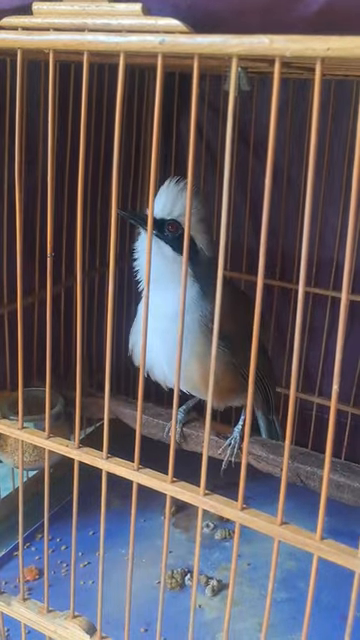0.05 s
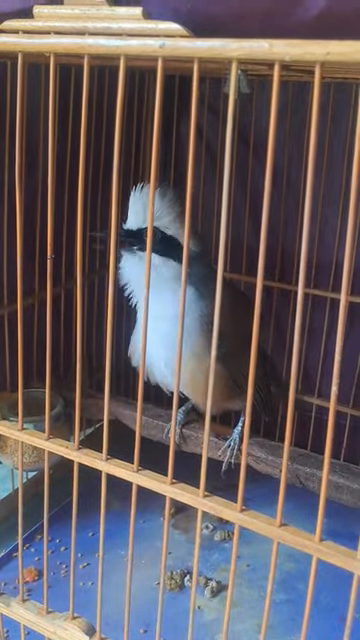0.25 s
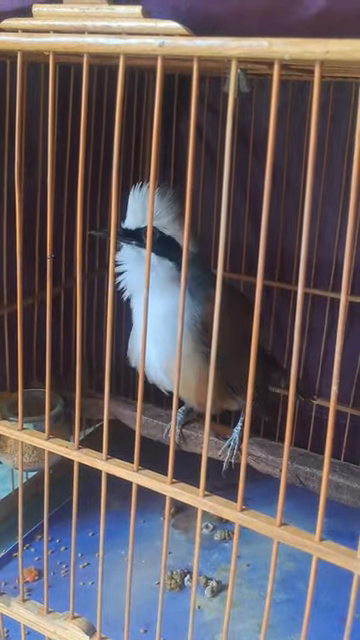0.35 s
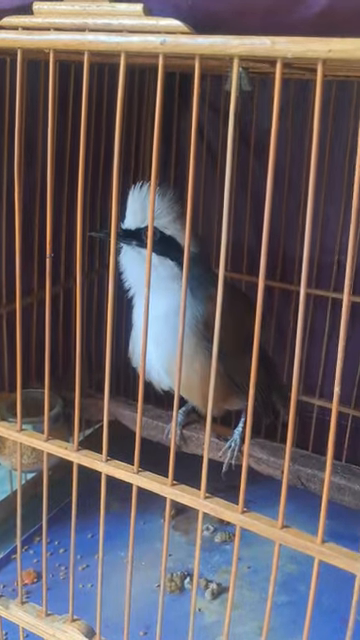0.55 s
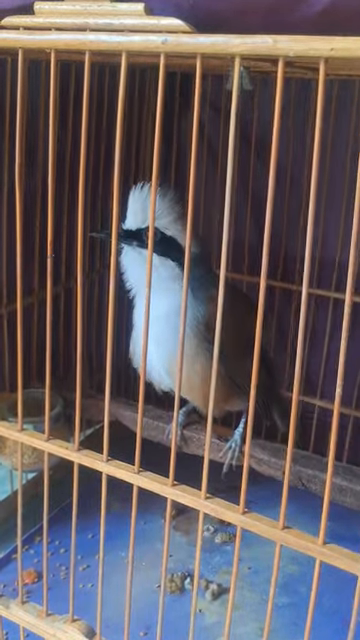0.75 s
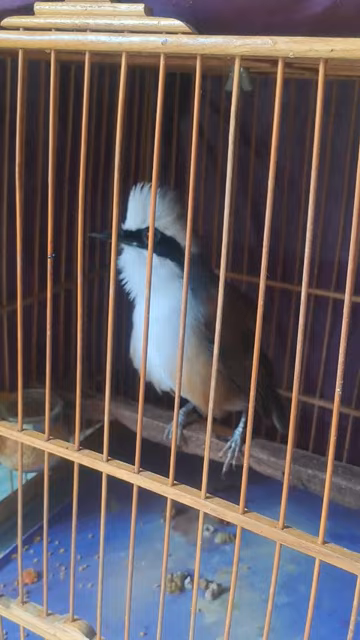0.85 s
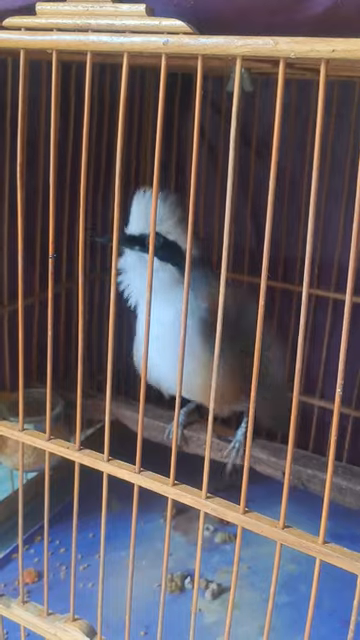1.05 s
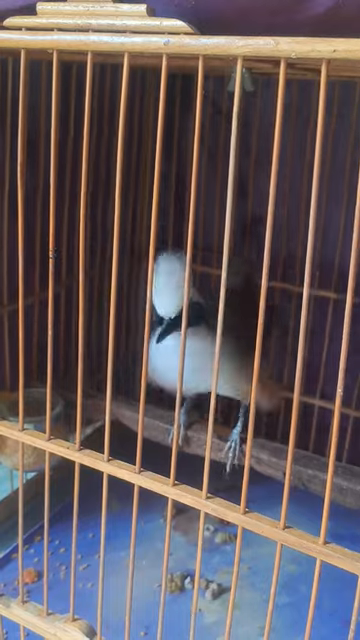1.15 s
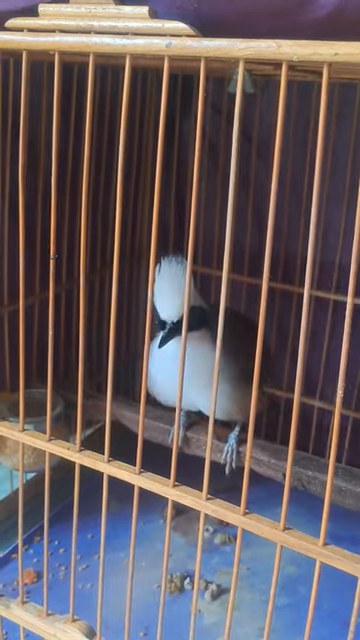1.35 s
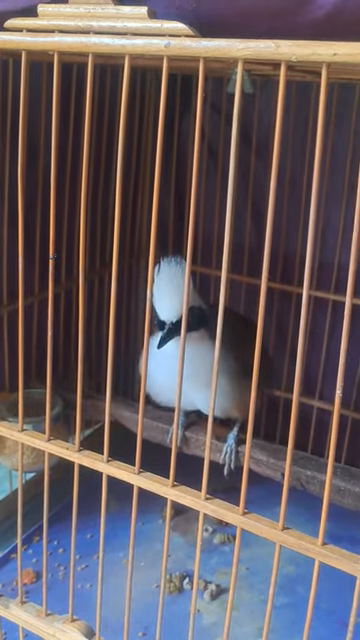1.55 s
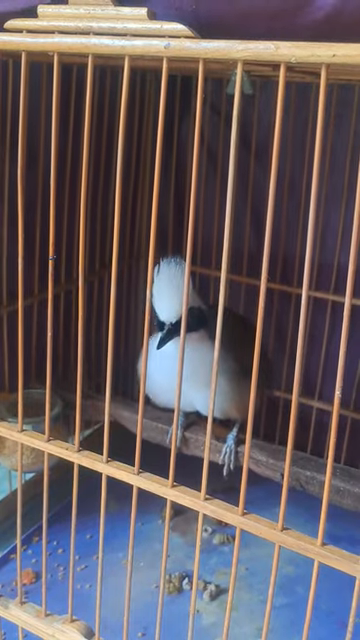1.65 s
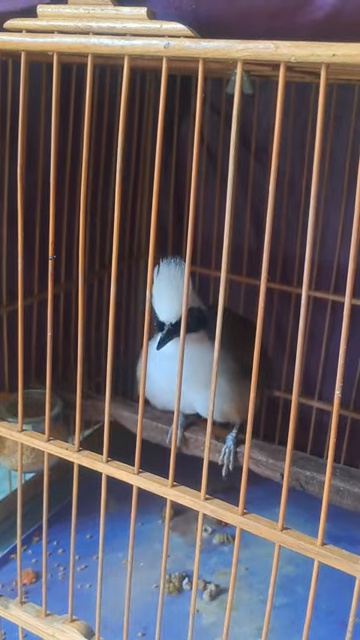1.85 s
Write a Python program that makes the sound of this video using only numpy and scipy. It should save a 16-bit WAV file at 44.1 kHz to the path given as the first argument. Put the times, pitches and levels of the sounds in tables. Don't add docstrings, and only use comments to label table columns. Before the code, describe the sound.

A caged thrush whoops once, loud and close, in a small hard room; scratchy feather and claw rustles follow, then a softer low answering call, bright rising chirps from a small bird, over faint low hum.

```python
import sys
import numpy as np
from scipy import signal
from scipy.fft import rfft, irfft
from scipy.io import wavfile
from scipy.ndimage import uniform_filter1d

SR = 44100
rng = np.random.default_rng(int(sys.argv[2]) if len(sys.argv) > 2 else 0)


def bounce(signal):
    frames = np.transpose(np.atleast_2d(signal))
    limited = np.clip(frames, -1, 1)
    pcm = np.round(limited * 32767).astype(np.int16)
    wavfile.write(sys.argv[1], SR, pcm)


def boost_factor(decibels):
    exponent = np.asarray(decibels, float) / 20
    return 10 ** exponent


N = 83790
TAIL = rng.standard_normal((2, int(.7 * SR)))


def curve(table, x, col=1):
    rows = np.array(table, float)
    return np.interp(x, rows[:, 0], rows[:, col])


def colour(table, hz):
    rows = np.array(table, float)
    return boost_factor(np.interp(np.log(np.maximum(hz, 1)), np.log(rows[:, 0]), rows[:, 1]))


def walk(rate_hz):
    k = max(int(SR / rate_hz), 2)
    steps = np.repeat(rng.standard_normal(N // k + 1), k)
    return 0.63 * uniform_filter1d(uniform_filter1d(steps, k), k)[:N]


def band(x, hz, width_hz):
    edges = np.clip([hz - width_hz / 2, hz + width_hz / 2], 20, .45 * SR)
    y = signal.sosfilt(signal.butter(2, edges, "band", fs=SR, output="sos"), x)
    return y / np.std(y)


def earlier_call():
    # hz, width_hz, level_db
    ringing = [(5500, 870, -25.5), (4300, 360, -47), (12100, 2500, -47), (2240, 1200, -55)]
    t60_s = 0.33
    fade = boost_factor(-60 * np.arange(N) / SR / t60_s)
    return fade * sum(boost_factor(db) * band(rng.standard_normal((2, N)), hz, w) for hz, w, db in ringing)


def hum():
    # hz, level_db_per_hz
    rumble_spectrum = [(24, -38.5), (40, -3.5), (146, -11.5), (354, -29.5), (1590, -46), (2500, -49),
                       (3250, -83), (5500, -120)]
    # time_s, level_db
    hum_swell = [(0, 9), (.2, 5.5), (.6, -4), (.85, 3.5), (1.7, 0.5), (1.9, 6.5)]
    t, hz = np.arange(N) / SR, np.fft.rfftfreq(N, 1 / SR)

    def shaped_noise(gain):
        spectrum = rfft(rng.standard_normal(N)) * colour(rumble_spectrum, hz)
        return irfft(spectrum * (hz < 3000) * gain, N)

    mid = shaped_noise(1)
    side = shaped_noise(np.clip(hz / 800, .05, 1))
    rumble = np.array([mid + side, mid - side]) / np.std(mid)
    motor_hz = 44.4 * (1 + 0.032 * walk(3.2))
    motor = boost_factor(-56.5 + 3.0 * walk(3.0)) * np.sin(2 * np.pi * np.cumsum(motor_hz) / SR)
    hiss = boost_factor(-67.5) * band(rng.standard_normal((2, N)), 7000, 11000)
    return boost_factor(curve(hum_swell, t)) * (boost_factor(-52) * rumble + motor) + hiss


def place(x, lead_s, pan_db, echo_db, wet_db):
    # delay_s, left_db, right_db
    echoes = [
        (.0042, -6, -14.5),
        (0.0116, -15, 1),
    ]
    # mode_hz, t60_s, level_db
    room_mode = (1632, .4, -20)
    mode_hz, mode_t60_s, mode_db = room_mode
    low_t60_s, high_t60_s, split_hz = 0.39, 0.4, 2200
    t = np.arange(int(.7 * SR)) / SR
    split = signal.butter(2, split_hz, fs=SR, output="sos")

    def tap(delay_s):
        return np.sinc((t - delay_s - .0005) * SR)

    out = []
    for side, noise in enumerate(TAIL):
        low = signal.sosfilt(split, noise)
        tail = low * boost_factor(-60 * t / low_t60_s) + (noise - low) * boost_factor(-60 * t / high_t60_s)
        tail = tail + boost_factor(mode_db - 60 * t / mode_t60_s) * np.sin(2 * np.pi * mode_hz * t + side)
        tail = tail * np.clip(t / 0.014, 0, 1) * boost_factor(wet_db) / np.sqrt(0.0085 * SR)
        near = tap(side * lead_s)
        for echo in echoes:
            near = near + boost_factor(echo[1 + side] + echo_db) * tap(echo[0] * (1 + 0.025 * side))
        out.append(signal.fftconvolve(x, near * boost_factor(pan_db * (1.0 - side)) + tail)[:N])
    return np.array(out)


def patchy(x):
    hz, spectrum = np.fft.rfftfreq(N, 1 / SR), rfft(x)
    third = np.log2(np.maximum(hz, 1500) / 1500) * 3
    out = 0
    for k in range(12):
        share = np.clip(1 - abs(third - k), 0, 1)
        out = out + irfft(spectrum * share, N) * boost_factor(6.5 * walk(40))
    return out


def rustles():
    # start_s, rise_s, t60_s, centre_hz, level_db
    strokes = [(0.167, 0.012, 0.23, 5020, -38.5), (.17, .015, .2, 2600, -48), (.215, .02, 0.41, 3290, -35),
               (.213, .008, .12, 1900, -27), (.4, .03, 0.32, 3516, -50), (.516, .012, 0.17, 6500, -44.5),
               (.518, .012, .2, 2676, -46), (0.713, 0.018, 0.29, 6300, -42),
               (.784, 0.0063, 0.17, 3520, -44.5), (.842, .006, .2, 5500, -42),
               (.938, .008, 0.54, 4810, -51), (1.062, .04, 0.394, 5774, -40),
               (1.062, .02, 0.3, 9840, -43.5), (1.065, .03, 0.33, 2960, -43.5),
               (1.155, 0.017, .3, 4490, -37), (1.155, .02, 0.27, 12550, -42),
               (1.19, 0.013, .3, 6150, -45.5), (1.27, .03, .22, 4700, -49.5), (1.28, .015, .4, 8920, -60),
               (1.37, .02, 0.51, 4030, -62.5), (1.574, .015, .4, 3500, -62.5),
               (1.659, .015, .4, 3500, -66.5), (1.75, .012, .35, 13300, -53), (1.815, .05, .3, 4420, -45),
               (1.845, .02, .3, 9500, -52), (.76, 0.054, 0.44, 445, -62)]
    t, out = np.arange(N) / SR, 0
    for start, rise, t60, hz, db in strokes:
        grains = rng.standard_normal(N) * boost_factor(7.2 * walk(250))
        body = band(grains, hz, 0.88 * hz) + boost_factor(-10.5 - 4000 / hz) * band(grains, 8300, 15000)
        age = t - start
        decay = boost_factor(-60 * np.maximum(age - rise, 0) / t60)
        out = out + body * boost_factor(db) * np.clip(age / rise, 0, 1) ** 2 * decay
    return patchy(out)


def whistles(table, overtones_db, bend, swell_db, rough):
    swell_shares = [1.8, 1, 1.6, .25]
    t, out = np.arange(N) / SR, 0
    hoarse = [1 + rough * k ** 1.6 * walk(2000) for k in range(1, len(overtones_db) + 1)]
    for end, length, from_hz, to_hz, db in table:
        u = np.clip((t - end) / length + 1, 0, 1)
        hz = from_hz + (to_hz - from_hz) * np.sin(np.pi / 2 * u) ** bend
        phase = 2 * np.pi * np.cumsum(hz) / SR
        swell = swell_db * (np.minimum(u / 0.9, 1) - 1)
        shape = np.clip(u / .15, 0, 1) * np.clip((1 - u) / .25, 0, 1)
        note = 0
        for k, (tone_db, flutter, share) in enumerate(zip(overtones_db, hoarse, swell_shares), 1):
            note = note + boost_factor(tone_db + share * swell) * flutter * np.sin(k * phase)
        out = out + boost_factor(db) * shape * note
    return out


def pips():
    # end_s, length_s, from_hz, to_hz, level_db
    pip_notes = [(.746, .011, 5300, 5500, -35), (.772, .011, 4900, 5000, -35), (.862, .02, 5000, 4300, -38),
                 (.537, .012, 4900, 5050, -42), (.866, .008, 7800, 7900, -41),
                 (1.171, .012, 4800, 4900, -39), (1.182, .02, 4200, 3600, -40),
                 (1.305, .012, 4500, 4750, -41), (1.296, .035, 2300, 4600, -46),
                 (1.286, .01, 3600, 3750, -44), (.188, .012, 5600, 5300, -35),
                 (.203, .014, 4600, 5100, -34)]
    return whistles(pip_notes, [1.5], bend=1.1, swell_db=3, rough=.35)


def call(table, overtones_db, throat, jitter, shimmer_db, breath_db, rasp_db, dull_db_s):
    # hz, width_hz, level_under_tone_db
    beak_rasp = [(6600, 485, -33.5), (7500, 800, -36), (12500, 4460, -36), (15000, 1020, -41),
                 (4000, 2500, -41.5)]
    second_hz, side_tone_db = 245.4, -3.5
    t = np.arange(N) / SR
    start, end = table[0][0], table[-1][0]
    second_db = curve(table, t, col=3)
    rough = np.clip(curve(table, t, col=4), 0, 1)
    hz = uniform_filter1d(curve(table, t), 400) * (1 + jitter * rough * walk(70))
    phase = 2 * np.pi * np.cumsum(hz) / SR
    low = 2 * np.pi * np.cumsum(second_hz * (1 + 0.04 * walk(30))) / SR
    gate = np.clip((t - start) / 0.013, 0, 1) * np.clip((end + 0.011 - t) / 0.015, 0, 1)
    tone = 0
    for k, db in enumerate(overtones_db, 1):
        dull = (k > 1) * (k * hz < 3000) * dull_db_s * np.clip(t - start, 0, .4)
        level = boost_factor(db + dull + shimmer_db * rough * walk(120))
        tone = tone + level * colour(throat, k * hz) * np.sin(k * phase)
        for sign in (-1, 1):
            level = boost_factor(db + side_tone_db + second_db + 3.6 * walk(40.41))
            gain = level * colour(throat, k * hz + sign * second_hz)
            tone = tone + gain * np.sin(k * phase + sign * low)
    tone = tone / np.sqrt(uniform_filter1d(tone ** 2, 1500) + 1e-9)
    breath = np.sin(phase) + np.sin(2 * phase) * colour(throat, 2 * hz)
    breath = boost_factor(breath_db) * rough * walk(500) * breath
    rasp = 0
    for f, width, db in beak_rasp:
        rasp = rasp + boost_factor(db + rasp_db + 6.2 * walk(65)) * band(rng.standard_normal(N), f, width)
    return (tone + breath + rasp) * gate * boost_factor(curve(table, t, col=2))


def whoop():
    # time_s, pitch_hz, level_db, second_voice_db, roughness (0-1)
    glide = [
        (.214, 464.6, -36, -23, 1),
        (.228, 531, -14, -25, 0.3),
        (.263, 740.7, -14.5, -28.5, 0.5),
        (.279, 978, -9.5, -34, 0.5),
        (.296, 1388, -5.5, -45, 0.3),
        (.32, 1582, -12, -42.5, 0.3),
        (.35, 1642, -6.5, -37, 0.1),
        (.39, 1020, -15, -31.5, 0.48),
        (.445, 443, -38, -21.5, 0.5),
    ]
    # hz, level_db
    near_throat = [(400, -12.5), (900, -8), (1500, 10), (2250, -7.5), (2700, -43), (5800, -47),
                   (6500, -26.5), (8200, -32.5)]
    overtones = [-4.5, 0, -3, 2.5, 0, -19, -6.5, -9.5, -9]
    return call(glide, overtones, near_throat, jitter=0.044, shimmer_db=16, breath_db=-14,
                rasp_db=5, dull_db_s=-96.5)


def far_chirps():
    # end_s, length_s, from_hz, to_hz, level_db
    far_notes = [
        (.89, .016, 2900, 3500, -37.5),
        (.962, .024, 2800, 3650, -34),
        (1.018, .018, 2800, 3600, -32.5),
        (1.882, .024, 2200, 3000, -35.5),
        (1.897, 0.02, 3400, 3650, -42),
    ]
    overtones = [-4.5, 0, -13.5, -20]
    return whistles(far_notes, overtones, bend=0.91, swell_db=2, rough=0.39)


def answers():
    # time_s, pitch_hz, level_db, second_voice_db (over the tone), roughness (0-1)
    first = [
        (.95, 552.2, -41, 1, 0.58),
        (.972, 615.5, -35.5, -6.5, 0.16),
        (1.02, 659.4, -31, -18.5, 0.2),
        (1.152, 676.7, -31.5, -16.5, 0.03),
        (1.2, 610.7, -35.5, -13, 0.42),
        (1.214, 649, -33, -14, 0.33),
        (1.232, 594.7, -34.5, -10.5, 0.33),
        (1.286, 624.2, -37, -13, 0.41),
        (1.306, 539.3, -41, 5.5, 1),
    ]
    again = [
        (1.797, 520, -40, -14.5, 1),
        (1.816, 556.3, -36.5, 7.5, .9),
        (1.834, 615, -29.5, -6.5, .6),
        (1.855, 647, -27.5, -15.5, 0.1),
        (1.9, 645.7, -28, -16, 0.3),
    ]
    # hz, level_db
    far_throat = [(400, -43), (620, -15.5), (1000, -3.5), (1300, -3.5), (1620, -10.5), (2000, -11.5),
                  (2500, -26.5)]
    overtones = [-2, 0, -6.5]
    return sum(call(c, overtones, far_throat, jitter=0.039, shimmer_db=8.5, breath_db=-7.5,
                    rasp_db=-14.0, dull_db_s=-11.5) for c in (first, again))


def finch():
    # end_s, length_s, from_hz, to_hz, level_db
    clear_notes = [
        (1.157, 0.022, 3500, 3930, -24.5),
        (1.505, .035, 3160, 3942, -20),
        (1.685, 0.034, 3215, 3926, -22),
        (1.789, 0.033, 3113, 3930, -22),
    ]
    hoarse_notes = [
        (1.295, 0.029, 3302, 4016, -31.5),
        (1.409, 0.031, 3010, 3780, -26),
        (1.599, 0.037, 2773, 3933, -24.5),
    ]
    clear_overtones = [-22, 4.5, -26, -40]
    hoarse_overtones = [-25, 2, -32, -42.5]
    clear = whistles(clear_notes, clear_overtones, bend=1.1, swell_db=25, rough=.16)
    return clear + whistles(hoarse_notes, hoarse_overtones, bend=1.1, swell_db=22, rough=.55)


def scene():
    mix = earlier_call() + hum()
    mix = mix + place(rustles(), lead_s=.00018, pan_db=3.0, echo_db=1.5, wet_db=-7)
    mix = mix + place(pips(), lead_s=.00019, pan_db=.8, echo_db=-14, wet_db=-11)
    mix = mix + place(whoop(), lead_s=.00015, pan_db=1.45, echo_db=-4.5, wet_db=-10.5)
    mix = mix + place(far_chirps(), lead_s=.00015, pan_db=1.5, echo_db=-4, wet_db=-2.5)
    mix = mix + place(answers(), lead_s=.0001, pan_db=3.5, echo_db=-22, wet_db=-10.5)
    return mix + place(finch(), lead_s=.00024, pan_db=0.5, echo_db=-11.5, wet_db=-9)


def roll_off(x):
    return signal.sosfilt(signal.butter(12, 15710, fs=SR, output="sos"), x)


def record(dry):
    # hz, level_db
    mic_response = [(25, -42.5), (42, -0.5), (8250, -4), (8800, -6), (10300, -5.5), (11200, -6)]
    x = irfft(rfft(dry) * colour(mic_response, np.fft.rfftfreq(N, 1 / SR)), N)
    top_hz = 15700
    x = signal.sosfilt(signal.ellip(8, .2, 70, top_hz, fs=SR, output="sos"), x)
    return roll_off(x)


dry = scene()
out = record(dry)
bounce(out)
```